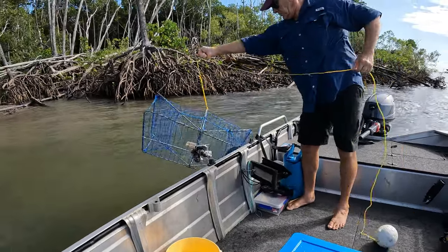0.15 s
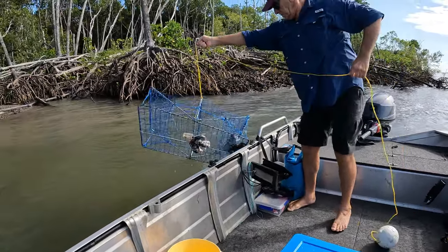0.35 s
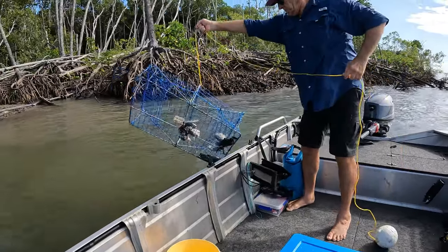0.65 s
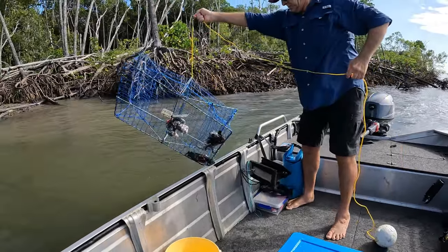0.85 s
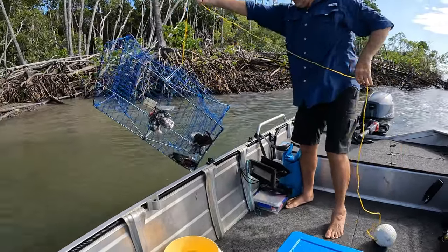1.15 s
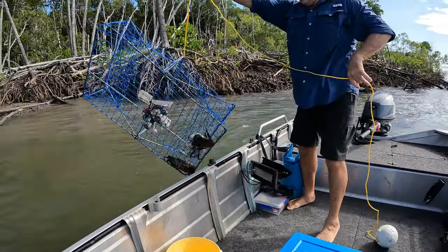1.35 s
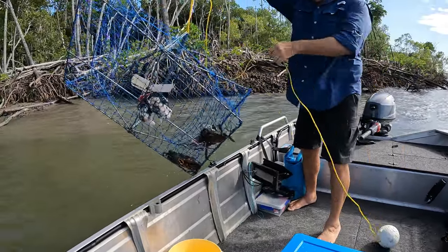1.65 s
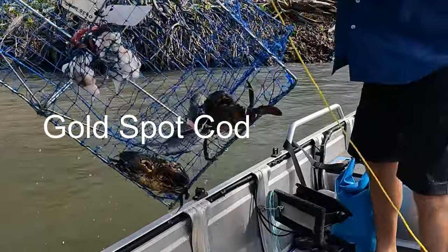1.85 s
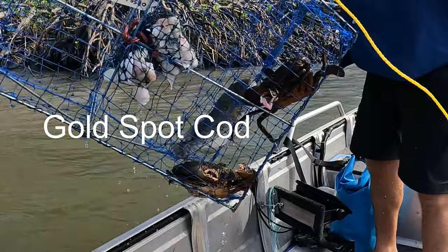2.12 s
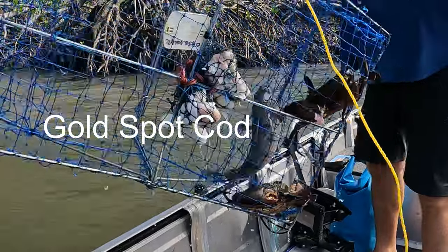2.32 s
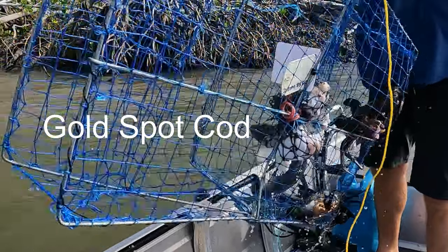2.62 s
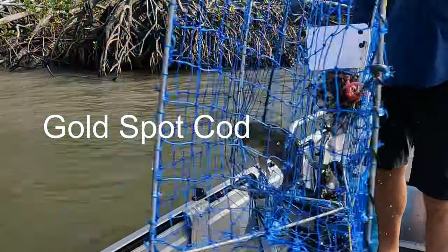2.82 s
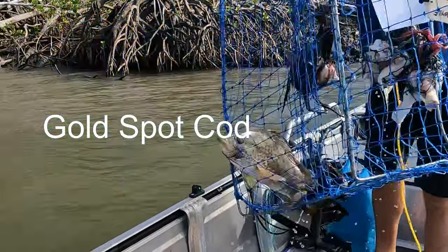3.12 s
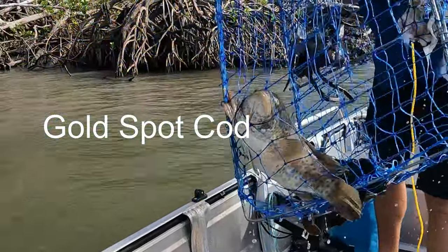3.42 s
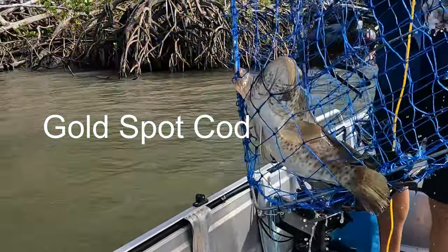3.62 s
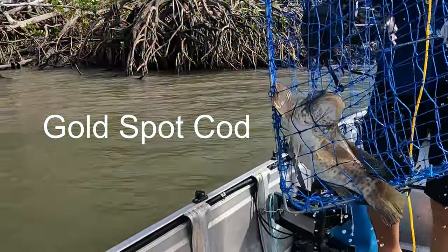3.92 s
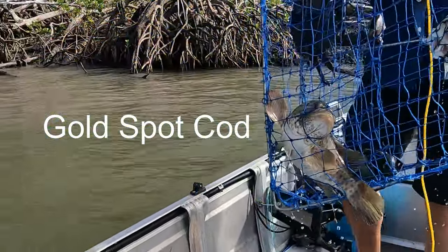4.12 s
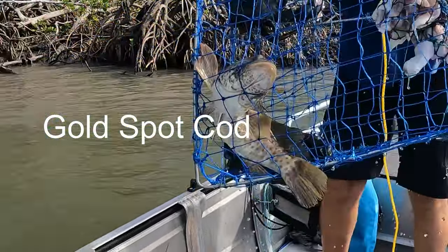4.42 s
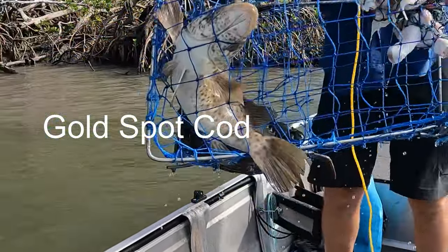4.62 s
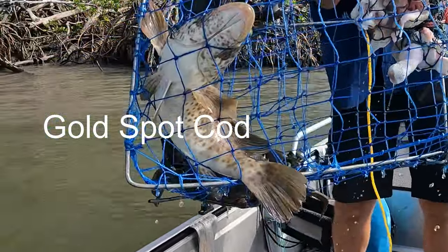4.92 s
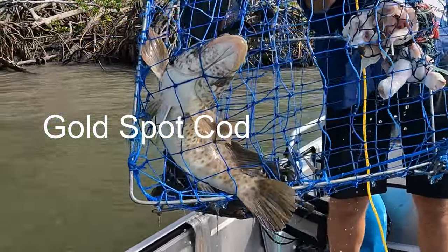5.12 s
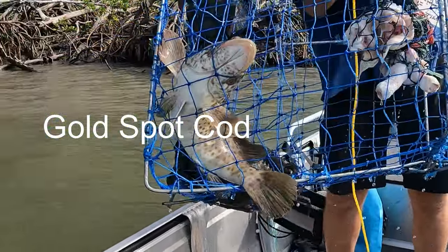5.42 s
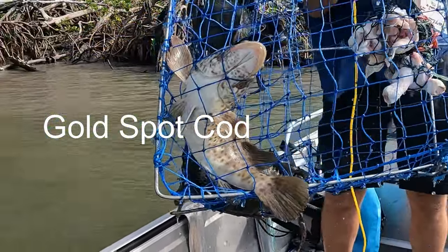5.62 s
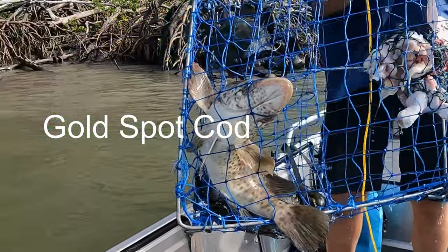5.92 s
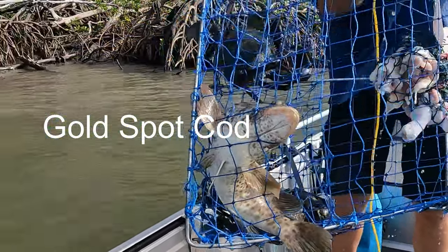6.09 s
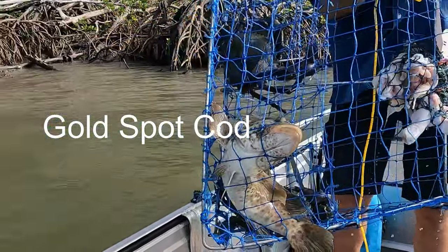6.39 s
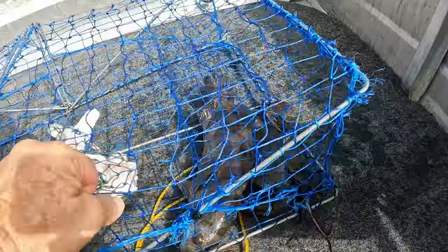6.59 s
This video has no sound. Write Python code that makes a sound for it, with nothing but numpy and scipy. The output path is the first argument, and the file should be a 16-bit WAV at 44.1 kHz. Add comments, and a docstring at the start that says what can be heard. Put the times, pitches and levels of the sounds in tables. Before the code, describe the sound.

Throughout, heard from aboard a small metal boat, an outboard idles with a low, pulsing burble, a faint thin whine and the soft throb of a small pump. At about 0.4 seconds a wire trap knocks loudly on the rim, ringing the hull, with a duller thump near 0.9. Water slaps the side with hollow blows. From 1.6 to 1.9 seconds comes a loud, rattling cluster of knocks, the panels booming and the trap's frame rasping. Water then runs off the trap in gushes, with drips, plops, short bright wire clinks and tiny snaps of wet mesh. A lighter knock lands around 3.1 seconds. The dripping is heaviest from about 4.5 to 5.5 seconds, over a stronger engine rumble, then eases. At 6.5 seconds the sound cuts abruptly to a much quieter, faint drone with a few small ticks.

```python
"""A wire trap is hauled from a creek over the side of an aluminium boat, knocking on the rim.
Each knock rings the hull and rasps the frame; wires clink, wet mesh snaps, water runs off and drips.
Water slaps the hull, the twin-cylinder outboard idles with a thin whine, and a small pump throbs.
Near the end the sound cuts abruptly to a much quieter scene with a faint drone."""
import sys
import numpy as np
from scipy import signal
from scipy.io import wavfile

SR = 44100
rng = np.random.default_rng(int(sys.argv[2]) if len(sys.argv) > 2 else 0)


def to_wav(sig):
    """Store sig (one row per channel, or 1-D mono) as 16-bit WAV at the path in sys.argv[1].

    Samples outside -1..1 are clipped; the rate is SR.
    """
    pcm = np.clip(np.atleast_2d(sig), -1, 1) * 32767
    pcm = np.round(pcm).astype(np.int16)
    wavfile.write(sys.argv[1], SR, pcm.T)  # frames by channels


N = 297675
T = np.arange(N) / SR

# engine shaking the hull: t/s, once-a-turn level/dB, twice-a-turn level/dB, left over right/dB
HULL_SHAKE = [(0.0, -46, -36.5, 7), (1.07, -29.5, -34, -2.5), (3.5, -28, -27, -5), (4.4, -27, -29, -5.5),
              (4.67, -53, -27, -5), (5.1, -27, -29, -5.5), (6.5, -26, -26, -5.5)]
# resonances of the underwater exhaust: f/Hz, width/Hz, level/dB
EXHAUST_TONES = [(50.6, 3.9, -23), (73.9, 6.5, 10.5), (118, 11, 2), (136, 17.2, 26.5), (150.5, 11, 17.5),
                 (191, 5.7, -1.5)]
# loudness of the engine's whine: t/s, level/dB
WHINE_CURVE = [(0, -72.5), (1.8, -65), (3.9, -66), (4.2, -62.5), (6.5, -61)]
# tones of the whine: f/Hz, width/Hz, level/dB, loudest point/turns, swing/dB
WHINE_TONES = [(5640, 80, -2, .9, 6), (6070, 75, 0, .83, 8), (6290, 80, 0, .28, 6), (6620, 80, -4, .4, 4),
               (6000, 800, -9, .6, 2)]
# tone colour of the running water: f/Hz, level/dB
WASH_SPECTRUM = [(150, 46.5), (260, -22.5), (442, -2.5), (581, -22), (666, -2), (1110, -10.5),
                 (1210, -11.5), (1770, -15.5), (4520, -27.5), (6260, -38.5), (8520, -68.5), (12200, -35),
                 (15500, -101)]
# how alike that water sounds in both ears: f/Hz, likeness (1 = the same)
EAR_LIKENESS = [(60, 0.99), (180, 0.97), (550, 0.89), (1650, 0.85), (4970, 0.67), (15000, 0.46)]
# its treble brightens as the trap swings near: t/s, boost/dB
SPRAY_BOOST = [(0, 5.5), (1.5, 13), (1.9, 15.5), (6.75, 9.5)]
# each jolt of the trap sheds a gush of water: t/s, drip boost/dB
TRAP_GUSHES = [(0.0, -6), (0.9, 3), (1.302, 8), (1.8, 12), (2.35, 9.5), (2.8, 14), (3.8, 17), (4.49, 25),
               (5.2, 22.5), (6.2, 7)]
# water slapping the hull: t/s, level/dB, f/Hz
HULL_SLAPS = [(.13, -27.5, 203), (.14, -19, 75), (0.626, -20, 69), (0.716, -32.5, 510), (0.736, -25.5, 340),
              (0.802, -23.5, 230), (0.872, -26, 644), (2.222, -34.5, 536), (2.305, -25.5, 262),
              (2.521, -31, 231), (2.779, -24, 620), (2.884, -29, 560), (3.61, -32.5, 630),
              (3.663, -24.5, 295), (3.794, -36, 574), (4.421, -26, 490), (4.912, -31.5, 595),
              (5.085, -30, 336), (5.324, -29, 605), (5.419, -35, 487), (6.163, -29.5, 484),
              (6.198, -29.5, 434), (6.273, -35, 540)]
# big drops plopping: t/s, level/dB, f/Hz
DROP_PLOPS = [(0.779, -34.5, 1210), (0.871, -31, 1650), (0.904, -33, 1310), (0.981, -31.5, 1030),
              (1.408, -36.5, 1480), (1.9993, -31.5, 1430), (2.04, -35.5, 930), (2.13, -27, 1000),
              (2.278, -36.5, 1075), (2.3875, -38, 930), (2.404, -34.5, 1710), (2.476, -37.5, 1030),
              (2.632, -33.5, 1400), (3.158, -34.5, 1200), (3.353, -33.5, 1350), (3.62, -32, 1030),
              (3.6582, -30, 1620), (3.82, -37.5, 1560), (4.1155, -33.5, 980), (4.274, -34, 1070),
              (4.337, -35.5, 1200), (4.4338, -35, 1880), (4.4576, -31.5, 1080), (4.509, -32.5, 1040),
              (4.697, -30.5, 1140), (4.9155, -29, 944), (4.95, -35.5, 900), (5.029, -36, 1010),
              (5.0745, -25.5, 1260), (5.1472, -27.5, 1385), (5.215, -31.5, 1040), (5.2863, -32, 1400),
              (5.326, -30.5, 1090), (5.3463, -27, 930), (5.457, -37.5, 1080), (5.581, -33.5, 1177),
              (5.733, -36, 1530), (6.1645, -34.5, 1270), (6.318, -40, 1810), (6.73, -42.5, 1110)]
# snaps of wet mesh: t/s, level/dB, f/Hz
MESH_SNAPS = [(1.9144, -46, 6300), (2.0835, -49, 6730), (2.342, -43.5, 9100), (2.3703, -44, 9000),
              (2.467, -46, 8200), (2.5469, -46, 8000), (2.602, -45, 8000), (3.041, -35.5, 2980),
              (3.1312, -32, 5030), (3.151, -42, 8800), (3.268, -37, 3400), (3.279, -30, 3550),
              (3.669, -40, 4000), (3.7681, -47, 8750), (4.116, -34, 4140), (4.5294, -42, 10000),
              (5.0327, -50, 7000), (5.104, -35.5, 10000), (6.642, -46.5, 2930), (6.709, -41, 2860),
              (6.73, -47, 2960)]
# wire hitting wire: t/s, level/dB, f/Hz
WIRE_CLINKS = [(0.5034, -44.5, 2260), (0.6908, -35, 2610), (0.903, -35.5, 2440), (1.746, -33.5, 3850),
               (1.748, -34, 2830), (1.79, -40.5, 3280), (2.075, -40.5, 3840), (2.323, -43, 2780),
               (2.406, -42.5, 2630), (2.653, -37.5, 2500), (2.876, -39.5, 2290), (3.124, -42, 2370),
               (3.158, -35, 2450), (3.168, -36.5, 2750), (3.2784, -40, 2200), (3.6136, -40.5, 2440),
               (3.747, -44.5, 2940), (3.809, -41, 2600), (3.811, -44.5, 4000), (4.013, -38, 2140),
               (4.506, -39.5, 2430), (4.924, -43.5, 2650), (5.0535, -31, 2620), (5.225, -34.5, 2530),
               (5.313, -41, 2720), (5.336, -35.5, 2610), (6.0672, -42, 3300), (6.245, -37.5, 3320),
               (6.319, -38, 3100), (6.4225, -38, 3870), (6.455, -49.5, 4300)]
# knocks of the trap; the row at 1.609 s is a faint, gritty swell just before the loud knock:
# t/s, ring level/dB, boom level/dB, rasp level/dB, length/s, ring tilt/dB per octave
TRAP_KNOCKS = [(0.363, -11.5, -37, -18.5, 0.0068, -4.5), (.373, -8, -24, -26, 0.009, -7.5),
               (0.398, -25.5, -15, -39, 0.015, -38), (0.437, -37, -21.5, -45.5, 0.016, -45),
               (0.868, -31.5, -41, -43.5, 0.028, -11), (0.903, -27, -14.5, -59, 0.025, -4),
               (1.609, -29.5, -39, -33.5, 0.033, -11), (1.628, -13, -26, -15, 0.009, 6),
               (1.64, -17.5, -13.5, -32, 0.0089, 4), (1.655, -18, -12.5, -28.5, 0.013, -5),
               (1.697, -19, -41, -23, 0.0063, 6), (1.716, -28, -21, -31.5, 0.0094, 6),
               (1.731, -36, -30, -45, 0.0085, 0), (1.745, -21.5, -27, -30, 0.0067, 11),
               (1.766, -30, -23.5, -53, 0.0111, 0), (1.845, -31, -21, -33.5, 0.016, 1),
               (1.863, -22.5, -41, -36, 0.0091, -5), (3.149, -25.5, -33, -39, 0.0046, 8),
               (3.162, -40, -36, -38, 0.0069, 4)]
# ringing tones of the hull: f/Hz, level/dB, time to fade by 60 dB/s
HULL_TONES = [(400, -2, 0.11), (500, 6.5, 0.11), (557, 8.5, 0.09), (688, 8.5, 0.1), (830, 12.5, 0.061),
              (1010, 13.5, 0.074), (1110, 9.5, 0.063), (1303, 6, 0.031), (1483, -2, 0.05),
              (1690, -3, 0.069), (1930, -4, 0.062), (2500, -6.5, 0.046), (2910, -16, 0.06)]
# booming tones of its panels: f/Hz, level/dB, time to fade by 60 dB/s
PANEL_TONES = [(75, -8, 0.15), (102, -3, 0.19), (148, 2.5, 0.12), (200, 5.5, 0.043), (261, -2.5, 0.067),
               (332, -12.5, 0.11)]
# resonances of the trap's frame: f/Hz, width/Hz, level/dB
FRAME_TONES = [(2600, 560, 7), (2870, 147, 13), (3120, 66, 9), (3850, 150, 8), (4030, 250, 6.5),
               (4530, 200, 5), (4660, 160, 6), (5900, 2500, -6), (8000, 500, -3.5), (10000, 5300, -21),
               (12200, 1200, -10)]
# echoes off the hull's sides: channel (0 = left), delay/s, level/dB
HULL_ECHOES = [(0, 0.011, -13), (1, 0.015, -15)]

CUT_S = 6.523   # the quieter scene begins
IDLE_TURNS_PER_S = 15.004
TURNS = .531 + IDLE_TURNS_PER_S * T
PUMP_STROKES_PER_S, PUMP_HZ = 21.935, 577.4
WASH_DB, DRIPS_DB, DRIPS_PER_S = -51, -66.5, 450
GUSH_RISE_S, GUSH_FALL_S = .18, .35
PATTER_FROM_S, PATTER_PER_S = 3, 160
OPPOSITE = np.array([[1], [-1]])   # adds on the left, takes away on the right


def from_db(db):
    """Turn decibels into a gain."""
    return 10 ** (np.asarray(db) / 20)


def rms_one(x):
    """Scale to an average (rms) strength of 1."""
    return x / np.sqrt(np.mean(x ** 2) + 1e-20)


def peak_one(x):
    """Scale to a peak of 1."""
    return x / np.abs(x).max()


def in_time(rows):
    """Draw a table's columns as curves over time."""
    times, *columns = np.transpose(rows)
    return [np.interp(T, times, column) for column in columns]


def at_hz(rows, hz):
    """Look up a table's value at one pitch."""
    pitches, values = np.transpose(rows)
    return np.interp(np.log(hz), np.log(pitches), values)


def after_cut(db):
    """A gain that changes by db at the cut to the quieter scene."""
    return from_db(db * np.clip((T - CUT_S) / .03, 0, 1))


def per_turn(top, times=1):
    """A wave in step with the engine, with a crest at the share `top` of each turn."""
    return np.cos(2 * np.pi * times * (TURNS - top))


def panned(x, db):
    """Make two channels, the left louder by db."""
    return np.array([x * from_db(db / 2), x * from_db(-db / 2)])


def drift(rate_hz):
    """A smooth random wobble, about 1 in size."""
    r = np.exp(-80 * np.pi * rate_hz / SR)
    slow = signal.lfilter([1], [1, -2 * r, r * r], rng.standard_normal(N // 40 + 2002))[2000:]
    return np.interp(np.arange(N) / 40, np.arange(len(slow)), rms_one(slow))


def band(x, low_hz, high_hz):
    """Keep what lies between two frequencies."""
    edges = [low_hz, min(high_hz, .45 * SR)]
    return signal.sosfilt(signal.butter(2, edges, "band", fs=SR, output="sos"), x)


def ring(x, hz, fade_s):
    """Each click starts a tone that fades by 60 dB in fade_s."""
    r, w = from_db(-60 / (fade_s * SR)), 2 * np.pi * hz / SR
    return signal.lfilter([0, np.sin(w)], [1, -2 * r * np.cos(w), r * r], x + 1e-18)


def resonance(x, hz, width_hz):
    """Let through the sound near one pitch."""
    r, w = np.exp(-np.pi * width_hz / SR), 2 * np.pi * hz / SR
    return signal.lfilter([(1 - r * r) / 2, 0, (r * r - 1) / 2], [1, -2 * r * np.cos(w), r * r], x)


def pulses(cycles, jitter, spread_db):
    """One click a cycle, each a little early or late and of its own strength."""
    count = int(cycles[-1]) + 1
    luck = rng.standard_normal((count, 2))
    at = np.searchsorted(cycles, np.arange(count) + jitter * luck[:, 0])
    out = np.zeros(N + 1)
    out[at] = from_db(spread_db * luck[:, 1])
    out[0] = 0
    return out[:N]


def burst(t, rise_s, fall_s, channels):
    """Gritty noise that swells quickly and dies away."""
    shape = (1 - np.exp(-t / rise_s)) * np.exp(-t / max(fall_s, .001))
    return rng.standard_normal((channels, len(t))) * shape


def add(out, s, sound):
    """Mix a short sound in at s seconds."""
    i = round(s * SR)
    out[..., i:i + sound.shape[-1]] += sound[..., :max(N - i, 0)]


def hollow(hz, length_s, width, splash):
    """A blow, then noise in a hollow: a clear centre, a broader body and a crackle of spray."""
    t = T[:int(.2 * SR)]
    grit = burst(t, min(.3 * length_s, .003), length_s, channels=3)
    grit[0, 0] = .61 * np.sqrt(SR / (width * hz))   # the blow fills the hollow at once
    centre = resonance(resonance(grit[0], hz, width * hz), hz, 2 * width * hz)
    body = band(band(grit[1], .35 * hz, 1.83 * hz), .35 * hz, 1.83 * hz)
    specks = burst(t, .006, 1.8 * length_s, channels=1)[0] * (rng.random(len(t)) < .04)
    crackle = band(specks + 1e-9, hz, max(4400, 1.5 * hz))
    return peak_one(peak_one(centre) + splash * peak_one(body) + from_db(-21) * peak_one(crackle))


def blows(rows, base_s, width, splash, pan_db):
    """Hollow blows, each a little to one side; louder ones last longer, and none under 2.2 cycles."""
    out = np.zeros((2, N))
    for s, db, hz in rows:
        length_s = max(base_s * np.exp(.01 * (db + 30)), 2.2 / hz)
        blow = from_db(db) * hollow(hz, length_s, width, splash)
        add(out, s, panned(blow, pan_db * rng.standard_normal()))
    return out


def faint_drone():
    """A faint drone, heard only after the cut."""
    return from_db(-60) * rms_one(resonance(rng.standard_normal(N), 332.6, 6.9)) * (T > CUT_S)


def engine_whine():
    """Narrow bands of hiss near 6 kHz swell in turn, once per engine turn."""
    white = rng.standard_normal((3, N))
    hiss = white[0] + .52 * white[1:]
    tones = sum(from_db(db + swing_db * per_turn(top) + 2 * drift(30)) * resonance(hiss, hz, width)
                for hz, width, db, top, swing_db in WHINE_TONES)
    level = from_db(in_time(WHINE_CURVE)[0] + drift(3.6)) * after_cut(-29)
    return level * rms_one(band(tones, 5100, 7700)) * from_db([[-1.2], [1.2]])


def pump():
    """Slightly uneven strokes and rushing water make the pump's housing ring."""
    strokes = pulses((T - .036) * PUMP_STROKES_PER_S, jitter=.05, spread_db=2.5)
    rush = .012 * rng.standard_normal(N)
    hum = resonance(resonance(strokes + rush, PUMP_HZ, 52), PUMP_HZ, 72)
    return from_db(-48.5) * rms_one(hum) * after_cut(-35)


def engine_shake():
    """One firing a turn shakes the hull at one, two and three times that rate, over a deep rumble."""
    first_db, second_db, pan_db = in_time(HULL_SHAKE)
    first = from_db(first_db + .32 * drift(3)) * per_turn(.31)
    second = from_db(second_db + .5 * drift(1.9)) * per_turn(.24, times=2)
    third = from_db(second_db - 10.5 + 5.15 * drift(19.7)) * per_turn(.23, times=3)
    shake = panned(-np.sqrt(2) * (first + second + third), pan_db * (T < CUT_S))
    rumble = from_db(-46.5) * rms_one(band(rng.standard_normal(N), 27, 36)) * OPPOSITE
    return (shake + rumble) * after_cut(-24)


def exhaust():
    """Gas burbles out under water, two gulps and a weak one a turn; the water churns just after."""
    gulps = pulses(TURNS - .19, .013, 1.5) + pulses(TURNS - .295, .013, 2.2)
    gulps += .22 * pulses(TURNS - .7, .04, 4)
    gas = .005 * rng.standard_normal(N) - gulps
    burble = rms_one(sum(from_db(db) * rms_one(resonance(gas, hz, w)) for hz, w, db in EXHAUST_TONES))
    burble = signal.sosfilt(signal.butter(4, 280, fs=SR, output="sos"), burble)
    burble *= from_db(-33.5 - .22 * T)   # slowly sinks
    swirl = rng.standard_normal((3, N))
    slosh = from_db(-61.5) * rms_one(band(swirl[2], 96, 160)) * OPPOSITE
    churn = rms_one(band(swirl[0] + .018 * swirl[1:], 40.6, 118)) * from_db(-34 + .16 * per_turn(.33))
    return (burble + slosh) * after_cut(-21) + churn * after_cut(-6.5)


def gushes():
    """Extra run-off in dB: each gush swells quickly and drains more slowly."""
    s, db = np.transpose(TRAP_GUSHES)[:, :, None]
    length_s = np.where(T < s, GUSH_RISE_S, GUSH_FALL_S)
    return np.max(db * np.exp(-((T - s) / length_s) ** 2), axis=0)


def wash(level_db):
    """Running water: narrow bands of noise that flicker, partly together."""
    out, together = 0, drift(9)
    edges = 180 * 2 ** np.arange(0, 6.8, .4)
    spray_db = in_time(SPRAY_BOOST)[0]
    white = rng.standard_normal((2, 2, N))
    for k, (low, high) in enumerate(zip(edges, edges[1:])):
        mid, side = band(white[k % 2], low, high)
        hz = np.sqrt(low * high)
        alike = at_hz(EAR_LIKENESS, hz)
        gain = from_db(at_hz(WASH_SPECTRUM, hz) + 2.2 * together + 2.8 * drift(16))
        gain *= from_db(spray_db * np.clip(np.log2(hz / 5000), 0, 1))
        gain *= after_cut(-13 + 4.5 * np.log2(max(hz / 1000, 1)))   # low bands drop the most
        out += gain * (np.sqrt(1 + alike) * mid + np.sqrt(1 - alike) * side * OPPOSITE)
    return from_db(level_db) * out / np.std(band(out[0], 700, 3000))


def drips(level_db):
    """Drops fall in random clumps; each bubble rings for a few cycles, high ones more faintly."""
    sizes = from_db(3.8 * np.minimum(rng.exponential(1, N), 5)) * rng.choice([-1, 1], N)
    falls = rng.random(N) < DRIPS_PER_S * from_db(5 * drift(10)) / SR
    pitch_index, pans_db = rng.integers(0, 24, N), rng.normal(0, 1, 24)
    out = 0
    for k, hz in enumerate(np.geomspace(300, 9000, 24)):
        bubbles = ring(sizes * falls * (pitch_index == k), hz, 7 / hz)
        out += panned(bubbles * (hz / 1000) ** -.7, pans_db[k])
    return from_db(level_db) * rms_one(out) * after_cut(-23)


def splashes(rows):
    """Three small splashes trail each hit, the later ones fainter."""
    out = np.zeros((2, N))
    for s, db, hz in rows:
        for late, pitch, side in rng.random((3, 3)):
            bubble = hollow(hz * (.617 + .76 * pitch), length_s=.0068, width=.13, splash=.49)
            bubble *= from_db(db - 11 - 16 * late)
            add(out, s + .0067 + .055 * late, panned(bubble, 24 * (side - .5)))
    return out


def slaps():
    """Water hits the hull with low, hollow blows."""
    return blows(HULL_SLAPS, base_s=.024, width=.35, splash=.8, pan_db=1.2)


def plops():
    """Big drops land with a plop and splash."""
    return blows(DROP_PLOPS, base_s=.018, width=.16, splash=.55, pan_db=3) + splashes(DROP_PLOPS)


def mesh_snaps():
    """Wet mesh gives tiny, sharp snaps; fainter ones patter at random once the trap is aboard."""
    out, t = np.zeros((2, N)), T[:int(.03 * SR)]
    wait, size, pitch = rng.random((700, 3)).T
    times = PATTER_FROM_S - np.cumsum(np.log(wait)) / PATTER_PER_S
    patter = np.column_stack([times, -68 + 14.3 * size ** 2, 4000 + 8000 * pitch])
    for s, db, hz in [*MESH_SNAPS, *patter[times < CUT_S]]:
        grit = burst(t, .00035, .0015, channels=3) + .14 * burst(t, .0013, .011, channels=3)
        snap = resonance(resonance(grit[0] + .47 * grit[1:], hz, .87 * hz), hz, 1.1 * hz)
        add(out, s, from_db(db + rng.normal(1, .96) * OPPOSITE) * peak_one(snap))
    return signal.sosfilt(signal.butter(8, 13300, fs=SR, output="sos"), band(out, 900, 16000))


def wire_clinks():
    """Wire strikes wire: a short, bright note with an overtone, trailed by splashes."""
    out = blows(WIRE_CLINKS, base_s=.009, width=.09, splash=.4, pan_db=1.5)
    for s, db, hz in WIRE_CLINKS:
        add(out, s, from_db(db - 14) * hollow(2.09 * hz, length_s=.0035, width=.074, splash=.48))
    return out + splashes(WIRE_CLINKS)


def frame_rasp(t, scrape, tilt_db):
    """Each contact grips the frame somewhere else, so its tones vary in pitch and strength."""
    grips = rng.standard_normal((len(FRAME_TONES), 2)) * [.02, 3]
    rasp = 0
    for k, ((hz, width, db), (detune, uneven_db)) in enumerate(zip(FRAME_TONES, grips)):
        gain = (-1) ** k * from_db(db + uneven_db + tilt_db * np.log2(hz / 4000))
        fade = np.exp(-t * hz / 330)   # high wires fall silent sooner
        rasp += gain * resonance(scrape, hz * (1 + detune), width) * fade
    rasp[0] = signal.lfilter([1 / 3, 1], [1, 1 / 3], rasp[0])   # half a sample later on the left
    return peak_one(rasp)


def trap_knocks():
    """The trap hits the boat in gritty bursts: the hull rings, its panels boom, the frame rasps."""
    out, t = np.zeros((2, N)), T[:int(.4 * SR)]
    for s, ring_db, boom_db, rasp_db, length_s, tilt_db in TRAP_KNOCKS:
        grit = burst(t, .53 * length_s, length_s, channels=4)
        rattle = burst(t, length_s, 2.16 * length_s, channels=4)
        grit += from_db(-7) * band(rattle, 77, 5160)   # the frame rattles on, duller
        grit[0, int(length_s * SR / 2)] += .41 * np.sqrt(length_s * SR)   # a firm blow halfway
        uneven_db = rng.normal(0, 2, len(HULL_TONES) + len(PANEL_TONES))
        hull = 0
        for (hz, db, fade_s), luck in zip(HULL_TONES, uneven_db):
            gain = from_db(db + luck + tilt_db * np.log2(hz / 800))
            hull += gain * ring(grit[0], hz * (1 + .005 * luck), fade_s)
        hull = peak_one(hull) + .45 * peak_one(band(band(grit[1], 280, 1040), 330, 3000))
        boom = sum(from_db(db + luck) * ring(grit[0] + .05 * grit[2:], hz, fade_s)
                   for (hz, db, fade_s), luck in zip(PANEL_TONES, uneven_db[::-1]))
        bright_db = 4 + .45 * max(rasp_db - ring_db, -16)   # more rasp than ring sounds brighter
        rasp = frame_rasp(t, grit[1] + .16 * grit[2:], bright_db)
        add(out, s, from_db(ring_db) * hull + from_db(boom_db) * peak_one(boom) + from_db(rasp_db) * rasp)
    return out


def scene():
    """Mix everything; the hull's sides give the hits quick, dull echoes."""
    gush_db = gushes()
    run_off = wash(WASH_DB + .2 * gush_db) + drips(DRIPS_DB + gush_db)
    drone = faint_drone()
    hits = trap_knocks() + slaps() + plops() + wire_clinks() + mesh_snaps()
    dull = band(hits, 780, 2600)
    for channel, delay_s, db in HULL_ECHOES:
        add(hits[channel], delay_s, from_db(db) * dull[channel])
    return drone + engine_whine() + pump() + engine_shake() + exhaust() + run_off + hits


def record(dry):
    """Cut the highest treble steeply."""
    return signal.sosfilt(signal.cheby2(12, 70, 15800, fs=SR, output="sos"), dry)


dry = scene()
out = record(dry)
to_wav(out)
```